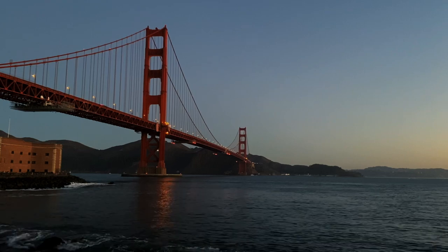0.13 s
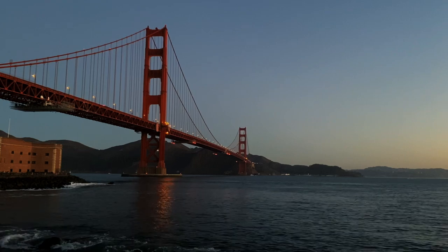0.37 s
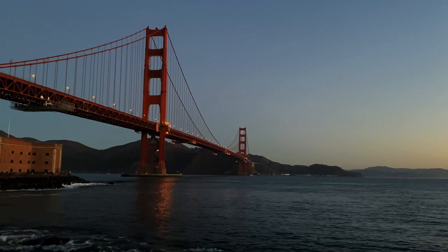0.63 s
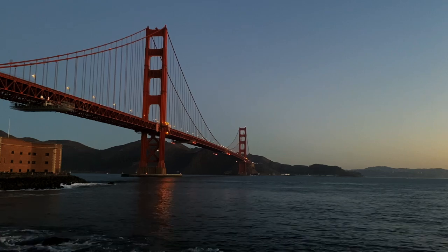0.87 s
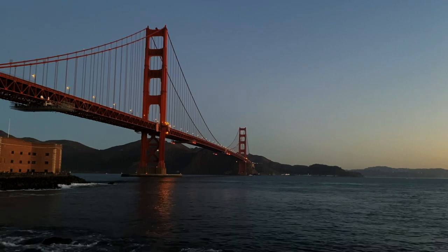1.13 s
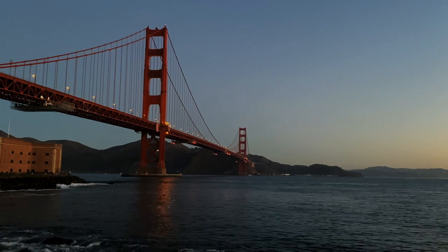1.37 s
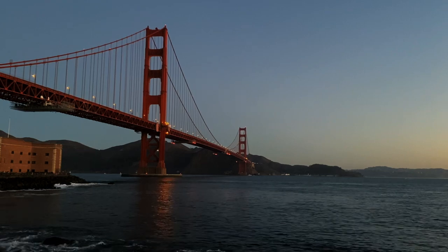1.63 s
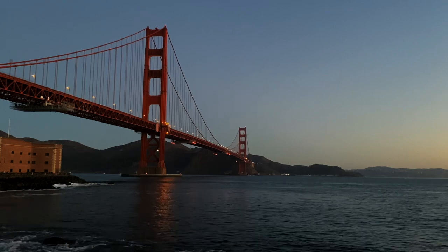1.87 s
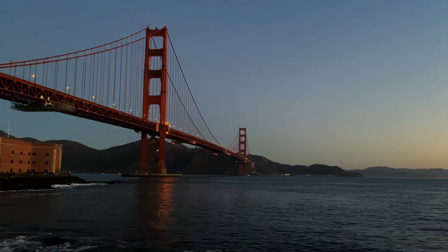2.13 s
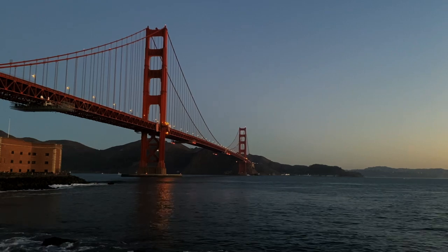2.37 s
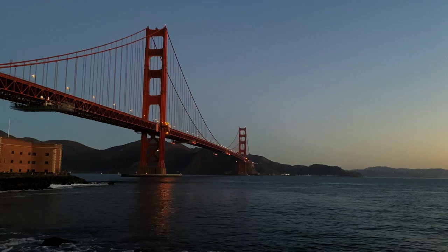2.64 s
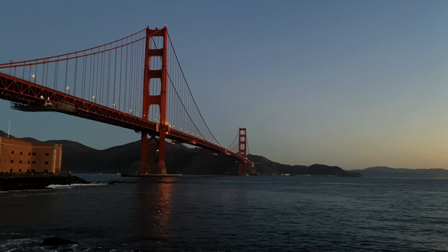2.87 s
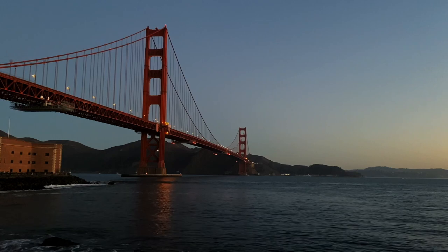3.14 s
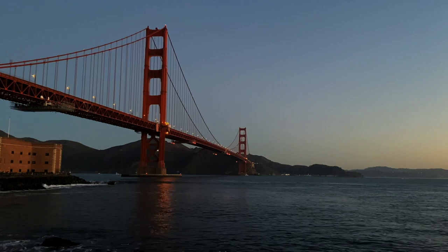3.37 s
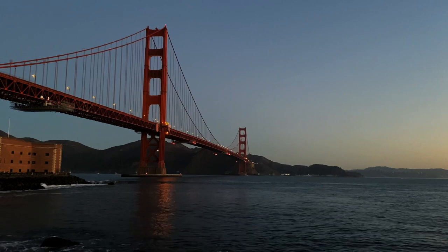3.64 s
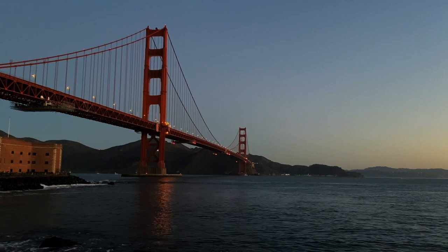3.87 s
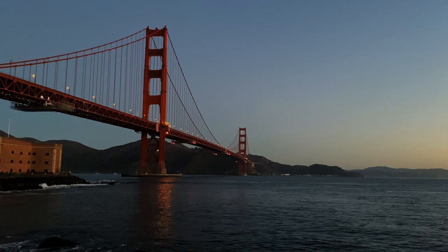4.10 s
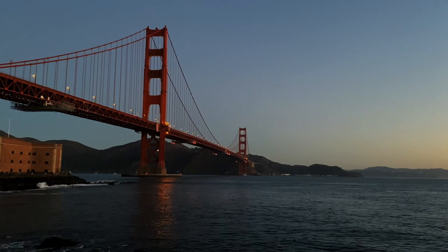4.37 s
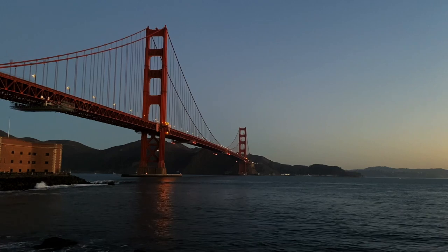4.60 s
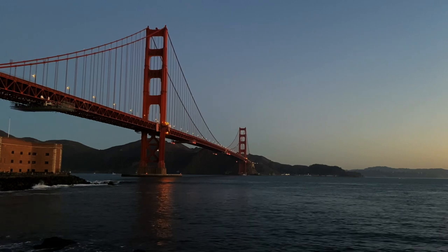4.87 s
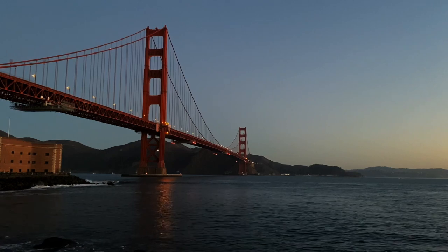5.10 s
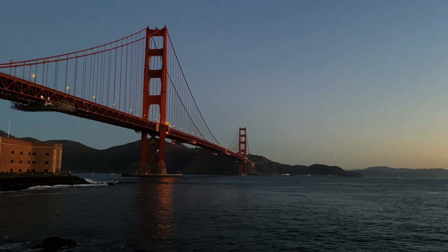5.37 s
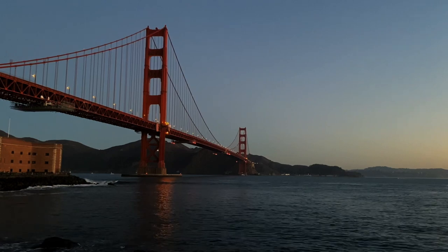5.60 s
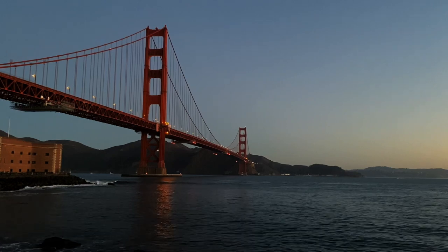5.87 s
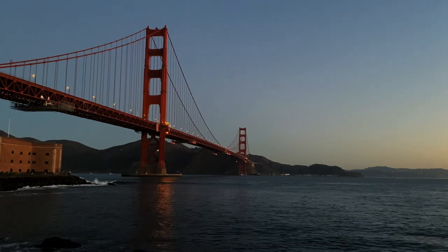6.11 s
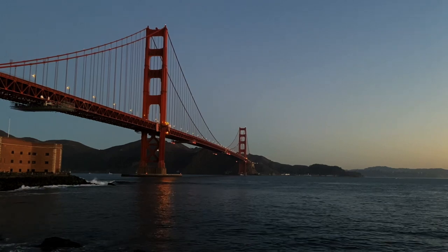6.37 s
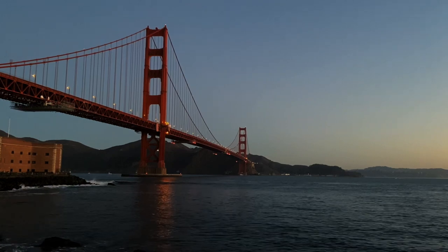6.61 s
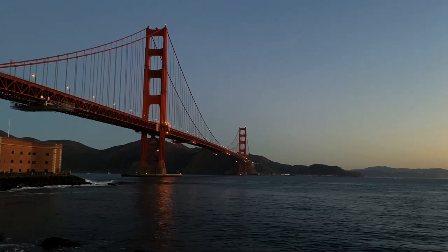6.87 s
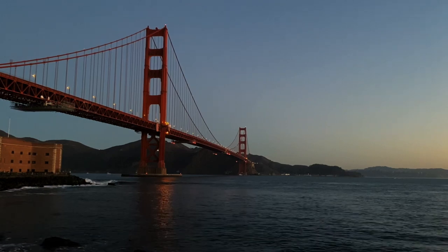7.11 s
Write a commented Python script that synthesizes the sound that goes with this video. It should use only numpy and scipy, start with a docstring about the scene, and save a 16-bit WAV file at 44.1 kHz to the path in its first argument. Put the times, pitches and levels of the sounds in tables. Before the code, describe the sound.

A rocky shore in open air, heard in wide stereo from near the waterline. From 0 s a soft, bass-heavy wash of far surf continues throughout, with a quiet deep drone of distant engines on three close low tones, gently wavering and swelling. Small muffled surges roll in between 0.3 and 2 s while the nearer wave slowly grows. From about 2.2 s it runs up the stones, tumbling and foaming; the bright fizz peaks near 3.3 s, with soft thud-like low surges around 3.1-3.7 s and again near 4.1 s, and short bursts on individual rocks. After 4.2 s the foam fades, and water drains hissing between stones, fullest around 5-5.2 s, then ebbing. A light patch of spray spatters at 5.4-5.8 s. By 6 s the near water is almost gone, leaving dull distant surf and low hum until the end at about 7.2 s.

```python
"""A rocky shore at dusk: a wave runs up the stones, breaks in low surges, some like thuds, and drains hissing.
Far surf washes on behind it, a last patch of spray spatters, and distant engines drone on three low tones.
Water is a swarm of random clicks, coloured by frequency; low surges are noise in a narrow band; engines are
wavering sines. The water is heard in stereo, with a likeness, phase and balance set by frequency."""
import sys
import numpy as np
from scipy import signal
from scipy.fft import rfft, irfft, next_fast_len
from scipy.io import wavfile

SR = 44100
rng = np.random.default_rng(int(sys.argv[2]) if len(sys.argv) > 2 else 0)


def elevation(decibels):
    """Turn decibel levels (scalar or array-like) into linear amplitude ratios."""
    levels = np.asarray(decibels, float)
    return 10 ** (levels / 20)


def waveform_to_disk(signal):
    """Save audio, clipped to [-1, 1], as 16-bit WAV at the path in sys.argv[1]."""
    frames = np.transpose(np.atleast_2d(signal))
    scaled = np.clip(frames, -1, 1) * 32767
    samples = np.round(scaled).astype(np.int16)
    wavfile.write(sys.argv[1], SR, samples)


N = 319284
SIZE = next_fast_len(N)
HZ = np.arange(SIZE // 2 + 1) * SR / SIZE + 1e-3  # just above zero, so that the logarithm exists
TOP_HZ = 15740

# the wave's slow rise and fall: (time [s], roar of tumbling water [dB], fizz of bursting foam [dB])
WAVE_LEVELS = [(0, -38, -52.5), (1.25, -34.5, -44.5), (2.2, -32.5, -39), (2.5, -28, -37.5),
               (2.95, -27.5, -34.5), (3.3, -25, -31), (3.6, -27.5, -32), (4.03, -29, -34),
               (4.2, -30, -37.5), (4.8, -33.5, -42), (5.3, -36.5, -44), (5.73, -43, -46), (5.9, -41, -57),
               (6.4, -45, -58), (6.8, -50, -63), (7.24, -43, -56)]
# tongues of water bursting on single rocks: (time [s], rise of the roar [dB], rise of the fizz [dB])
ROCK_BURSTS = [(2.4, 1.5, 1), (2.6, 1.1, 1.2), (3.05, 1.3, 0.5), (3.14, 3, 0), (3.26, 4, 1), (3.76, 0, 1.2),
               (4.1, 2.5, -1), (4.85, 1.5, -1)]
# far surf: (time [s], level [dB])
FAR_SURF_LEVELS = [(0, -32.5), (1.2, -31.5), (2.5, -38.5), (4, -28), (5.3, -35), (6.2, -34), (7.24, -36.5)]
# engine drone, per tone: (pitch [Hz], resting level [dB], swells)
# each swell: (time of the top [s], level [dB], half-length [s])
DRONE_TONES = [(71.1, -43.5, [(.95, -36, .12), (1.75, -33, .15), (2.65, -33.5, 0.18), (3.45, -43, .12),
               (4.17, -36, 0.16), (5.55, -35, 0.73), (6.95, -38, .25)]), (81.5, -39, [(.5, -29.5, 0.1),
               (.85, -33, .08), (1.32, -31.5, 0.22), (1.82, -34.5, 0.14), (3.35, -31, 0.19), (4.5, -30, .4),
               (5.3, -32.5, 0.67), (7.0, -30, 0.45)]), (95.9, -41, [(.57, -31.5, 0.12), (1.08, -32.5, 0.13),
               (2.38, -32.5, 0.17), (3.4, -37, .1), (4.12, -29.5, 0.19), (5.6, -35.5, .2),
               (6.4, -34, 0.19)])]
# low surges in the water's rumble, the strongest like thuds:
# (time [s], level [dB], pitch [Hz], length [s])
LOW_SURGES = [(0.331, -36, 127, .1), (0.814, -29, 110, .07), (0.919, -28, 137, 0.086),
              (1.11, -29, 127, 0.072), (1.271, -31.5, 118, 0.11), (1.83, -30, 119, 0.098),
              (2.249, -29, 104, 0.079), (2.423, -29.5, 97, 0.13), (3.139, -22, 124, 0.055),
              (3.322, -23, 100, 0.046), (3.386, -24, 94, 0.052), (3.62, -25, 114, 0.064),
              (3.739, -26.5, 125, 0.061), (4.05, -23, 132, 0.13), (4.085, -24, 108, 0.058),
              (4.13, -28, 105, 0.1), (4.782, -32, 119, 0.072), (4.97, -32, 131, 0.056),
              (5.937, -36.5, 117, 0.12)]
# a last patch of spray: (time [s], level [dB])
SPRAY_SPATTERS = [(5.33, -54), (5.45, -47), (5.56, -43), (5.63, -44), (5.7, -44.5), (5.77, -46)]
# colours of the five bodies of water: (frequency [Hz], relative density [dB per Hz])
FAR_SURF_COLOUR = [(25, -33), (50, -1.5), (85, -2.5), (130, -3.5), (200, -9.5), (350, -14), (600, -16.5),
                   (1000, -22), (1700, -28.5), (2500, -30), (4000, -35), (5500, -38), (8500, -38),
                   (13000, -46.5), (14300, -63), (16000, -56)]
ROAR_COLOUR = [(40, -5), (100, -2), (200, -3), (400, -2.5), (700, -4.5), (1200, -9.5), (2000, -15.5),
               (4000, -21), (9000, -45)]
FIZZ_COLOUR = [(400, -17), (1200, -5), (2500, -2), (4000, -6), (4900, -6.5), (5400, -9), (6200, -8),
               (8500, -8), (11000, -12), (13000, -22), (14300, -29), (15000, -29), (16000, -30)]
DRAIN_COLOUR = [(400, 0), (1200, 6), (2000, -6), (3500, -3.5), (5200, -7.5), (6500, -7), (9500, -6),
                (13000, -17.5), (16000, -35)]
SPRAY_COLOUR = [(1500, -20), (2600, 0), (3500, 5), (4400, -5), (5300, -10), (6500, -1), (9000, -6),
                (13000, -19), (16000, -32)]
# the stereo image of the water as heard, before each source is placed:
# (frequency [Hz], left-right likeness [0-1], lead of the left [rad], left over right [dB])
STEREO_IMAGE = [(20, .7, -.1, 0), (80, .86, -.15, 0), (250, .87, -.15, .3), (600, .5, -.5, 0),
                (950, .35, -.8, 0), (1500, .45, -1.0, 0), (1900, .4, -.8, 0), (2300, .6, .2, 0),
                (3200, .55, 1.0, 3), (4000, .35, 1.0, 4), (5000, .55, .65, 2.4), (5500, .5, 0, 1.5),
                (6000, .62, -.8, .6), (7000, .6, -.85, 0), (7900, .86, -2.6, .4), (8400, .92, -3.14, 0),
                (9400, .85, -4.5, 0), (10400, .97, -6.0, 0), (11700, .97, -6.6, 0), (12700, .85, -9.1, 0),
                (14100, .85, -9.8, 0), (15000, .85, -12.4, 0)]


def rms_one(x):
    """Normalisation: the root mean square is scaled to 1."""
    return x / np.sqrt(np.mean(x ** 2) + 1e-20)


def in_time(rows):
    """Linear interpolation: table columns become one value per sample."""
    s, *columns = np.transpose(rows)
    return [np.interp(np.arange(N) / SR, s, c) for c in columns]


def humps(s, height, rise_s, fall_s):
    """Superposition: bell-shaped swells with their tops at times s are summed."""
    column = (-1, 1)
    late = np.arange(N) / SR - np.reshape(s, column)
    width = np.where(late < 0, np.reshape(rise_s, column), np.reshape(fall_s, column))
    width = np.maximum(width, 1e-3)
    return np.asarray(height) @ np.exp(-(late / width) ** 2)


def drift(rate):
    """Low-passed noise: slow chance wandering about rate times a second, with spread 1."""
    step = 40  # samples between drawn values
    r = np.exp(-2 * np.pi * rate * step / SR)
    noise = rng.standard_normal(N // step + 2002)
    slow = signal.lfilter([1], [1, -2 * r, r * r], noise)[2000:]  # the filter's start is left out
    return np.interp(np.arange(N) / step, np.arange(len(slow)), rms_one(slow))


def bursts(per_s, spread_db):
    """Shot noise: spectra of two unrelated swarms of bubbles, random clicks of uneven size."""
    excess = np.minimum(rng.exponential(1, (2, SIZE)), 5)
    sizes = elevation(spread_db * excess) * rng.choice([-1, 1], (2, SIZE))
    return rfft(sizes * (rng.random((2, SIZE)) < per_s / SR))


def stereo_pair(shared, own, focus, lead):
    """Interchannel coherence: left-right likeness, phase and balance as heard depend on frequency."""
    hz, alike, phase, left_db = np.transpose(STEREO_IMAGE)
    around = np.exp(-np.log2(HZ / 1300) ** 2 / 1.8)  # the range where the direction of arrival tells
    alike = np.clip(np.interp(HZ, hz, alike) * (1 + (focus - 1) * around), 0, 1)
    phase = np.interp(HZ, hz, phase) + lead * around
    left_db = np.interp(HZ, hz, left_db)
    right = alike * np.exp(-1j * phase) * shared + np.sqrt(1 - alike ** 2) * own
    return np.array([shared * elevation(left_db / 2), right * elevation(-left_db / 2)])


def water(colour, per_s, spread_db, patchy_db, focus, lead):
    """Filtered shot noise: a coloured swarm of bubbles, flickering octave by octave.

    patchy_db scales the flicker; focus (likeness factor) and lead [rad] place the swarm near 1300 Hz."""
    shared, own = bursts(per_s, spread_db)
    hz, density_db = np.transpose(colour)
    tint = elevation(np.interp(np.log(HZ), np.log(hz), density_db, left=-90))
    pair = tint * stereo_pair(shared, own, focus, lead)
    together = drift(18)
    octave = np.clip(np.log2(HZ / 100), 0, 7)
    out = 0
    for k in range(8):
        band = np.cos(np.pi / 2 * np.clip(octave - k, -1, 1)) ** 2  # neighbouring bands sum to 1
        flicker_db = patchy_db * (0.62 * together + drift(27))
        out = out + irfft(pair * band, SIZE)[:, :N] * elevation(flicker_db)
    return rms_one(out)


def far_surf():
    """Ensemble averaging: a dense swarm of nearly even bubbles makes a steady distant wash."""
    swarm = water(FAR_SURF_COLOUR, per_s=30000, spread_db=1.0, patchy_db=0.9, focus=0.11, lead=-1.1)
    return elevation(in_time(FAR_SURF_LEVELS)[0]) * swarm


def wave_levels():
    """Decibel addition: bursts on single rocks multiply the wave's slow roar and fizz."""
    half_s = 0.038
    roar_db, fizz_db = in_time(WAVE_LEVELS)
    s, roar_up_db, fizz_up_db = np.transpose(ROCK_BURSTS)
    roar_db = roar_db + humps(s, roar_up_db, half_s, half_s)
    fizz_db = fizz_db + humps(s, fizz_up_db, half_s, half_s)
    return roar_db, fizz_db


def roar(level_db):
    """Broadband noise strongest at low frequencies: tumbling water as a sparser swarm."""
    swarm = water(ROAR_COLOUR, per_s=9000, spread_db=2.5, patchy_db=0.86, focus=0.8, lead=0.063)
    return elevation(level_db) * swarm


def fizz(level_db):
    """Broadband noise strongest in the treble: bursting foam as a dense swarm."""
    swarm = water(FIZZ_COLOUR, per_s=25000, spread_db=2.5, patchy_db=0.54, focus=0.56, lead=0.1)
    return elevation(level_db) * swarm


def drone():
    """Frequency and amplitude modulation: three engine tones waver in pitch and swell now and then."""
    tones = 0
    for hz, rest_db, swells in DRONE_TONES:
        s, top_db, half_s = np.transpose(swells)
        turns = np.cumsum(hz + 0.26 * drift(1.25)) / SR + rng.random()
        skew = 0.04 * drift(2.5) * np.array([[1], [-1]])  # turns; the channels wander oppositely
        level = np.maximum(elevation(rest_db), humps(s, elevation(top_db), half_s, half_s))
        tones = tones + np.sqrt(2) * level * np.sin(2 * np.pi * (turns + skew))
    return tones


def low_surges():
    """Band-pass filtering: noise near one low pitch swells softly, the strongest like thuds."""
    out = np.zeros((2, N))
    t = np.arange(SR // 2) / SR
    noise = rng.standard_normal((len(LOW_SURGES), 3, len(t)))
    for (s, level_db, hz, length_s), (mid, left, right) in zip(LOW_SURGES, noise):
        band = signal.butter(1, [hz / 1.47, hz * 1.28], "band", fs=SR)
        rumble = mid + 0.21 * np.array([left, right])
        rumble = signal.lfilter(*band, signal.lfilter(*band, rumble))
        # the noise's own rise and fall is made more even
        envelope = np.abs(signal.hilbert(rumble.mean(axis=0)))
        rumble = rms_one(rumble / (envelope + 0.25 * rumble.std()) ** 0.58)
        swell = t / max(length_s / 3, 1e-3)
        surge = elevation(level_db) * rumble * swell * np.exp(1 - swell)
        at = round(s * SR)
        out[:, at:at + len(t)] += surge[:, :N - at]
    return out


def drain():
    """Exponential decay: water between the stones swells, holds, then ebbs by a fixed dB a second."""
    start_s, swell_s, hold_s = 4.42, 0.57, 0.18
    level_db, ebb_db_per_s = -36, 31
    late = np.arange(N) / SR - start_s
    ebbing = np.maximum(late - swell_s - hold_s, 0)
    level = np.clip(late / swell_s, 0, 1) * elevation(level_db - ebb_db_per_s * ebbing)
    return level * water(DRAIN_COLOUR, per_s=20000, spread_db=3.0, patchy_db=1.3, focus=2.2, lead=-2.6)


def spray():
    """Shot noise: thousands of very uneven clicks a second are heard as a last patch of spatters."""
    s, level_db = np.transpose(SPRAY_SPATTERS)
    level = humps(s, elevation(level_db), rise_s=0.028, fall_s=0.055)
    return level * water(SPRAY_COLOUR, per_s=6000, spread_db=5.5, patchy_db=0.5, focus=1.5, lead=-1.3)


def scene():
    """Linear superposition: five bodies of water, the drone and the low surges add."""
    roar_db, fizz_db = wave_levels()
    wave = roar(roar_db) + fizz(fizz_db)
    return far_surf() + wave + drone() + low_surges() + drain() + spray()


def low_pass(x):
    """Removes everything above the highest recorded frequency."""
    return signal.sosfilt(signal.butter(12, 16820, fs=SR, output="sos"), x)


def record(dry):
    """Low-pass filtering: everything from TOP_HZ upward is removed."""
    mix = irfft(rfft(dry, SIZE) * (HZ < TOP_HZ), SIZE)[:, :N]
    return low_pass(mix)


dry = scene()
out = record(dry)
waveform_to_disk(out)
```